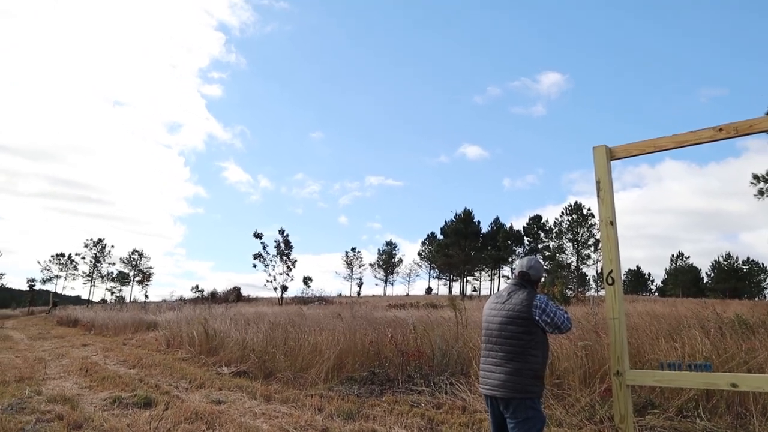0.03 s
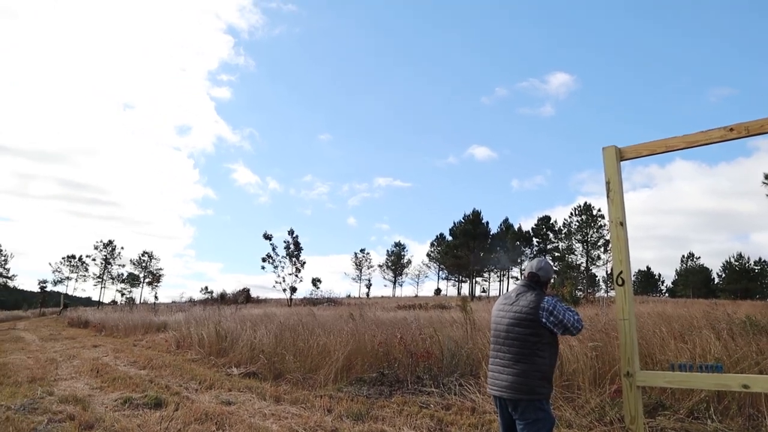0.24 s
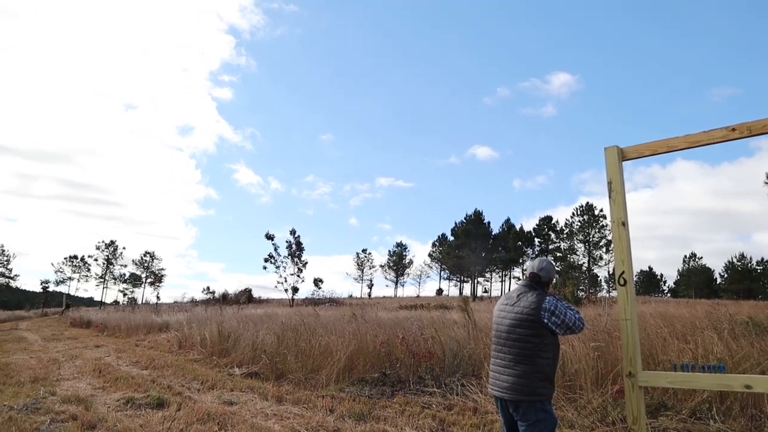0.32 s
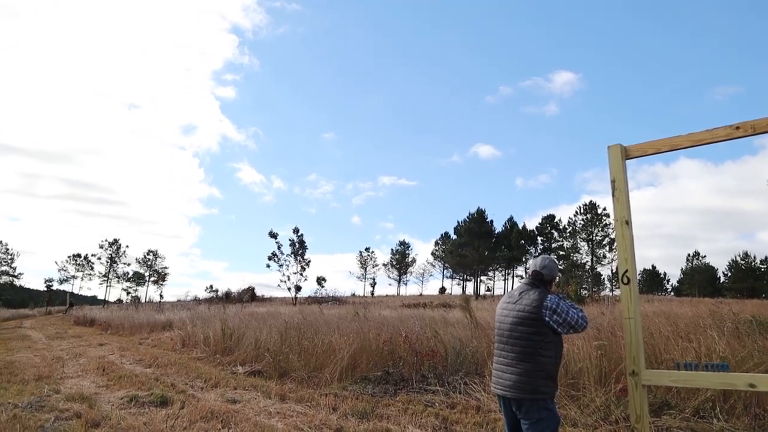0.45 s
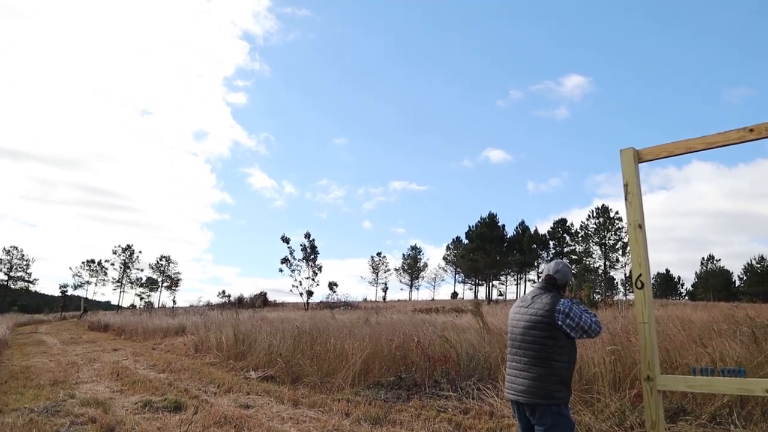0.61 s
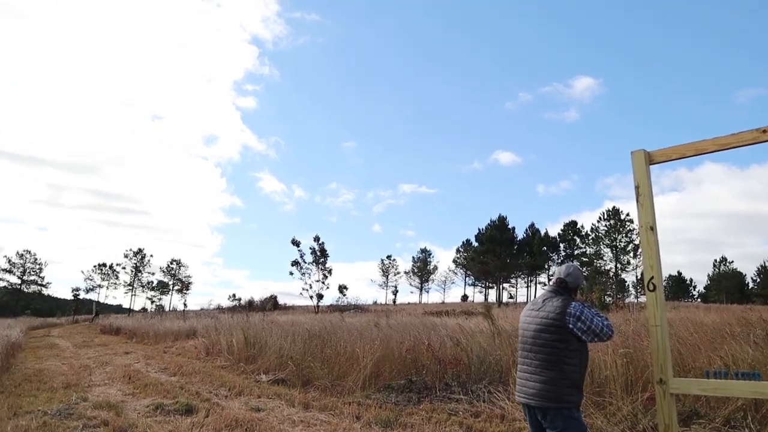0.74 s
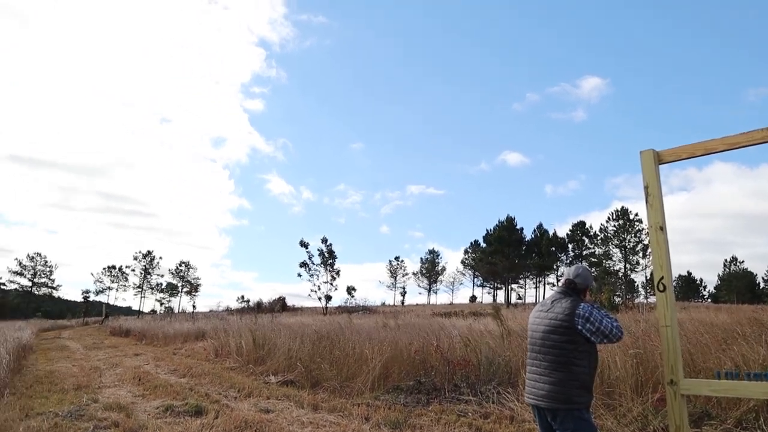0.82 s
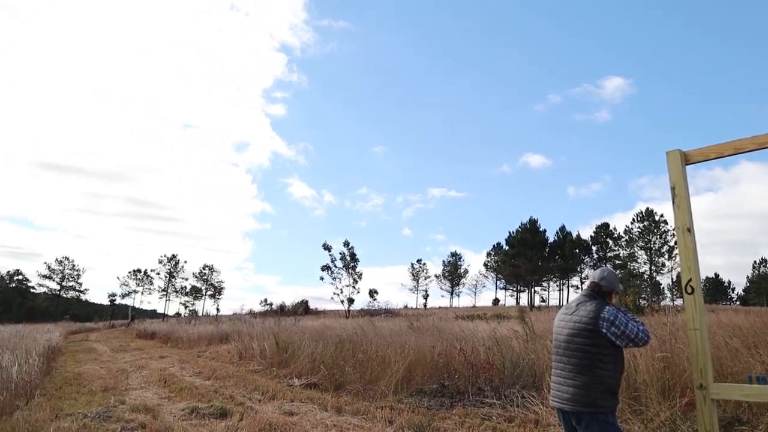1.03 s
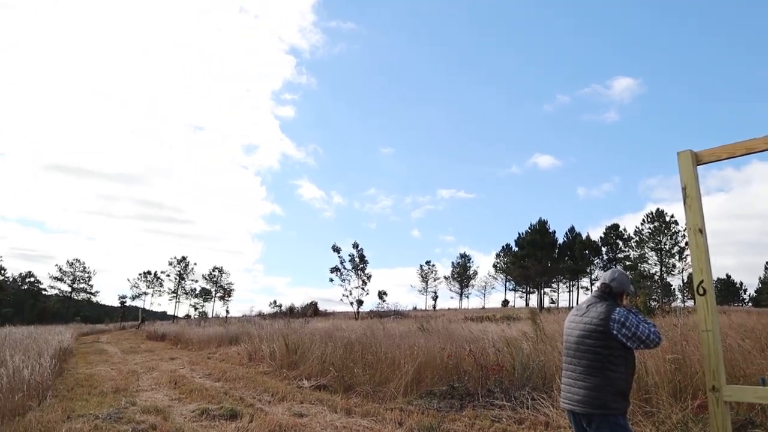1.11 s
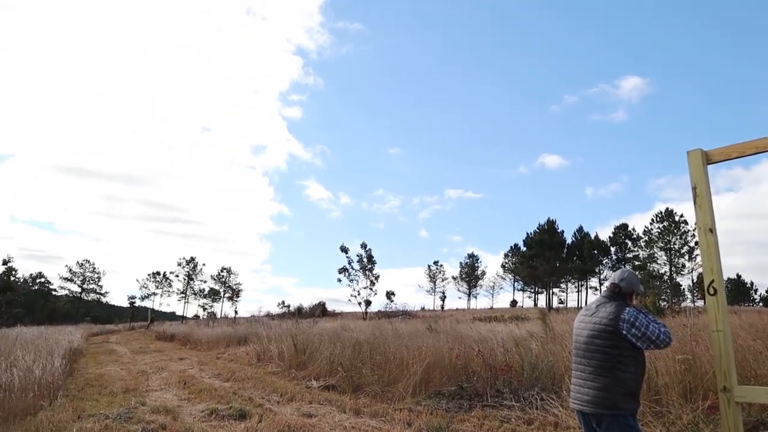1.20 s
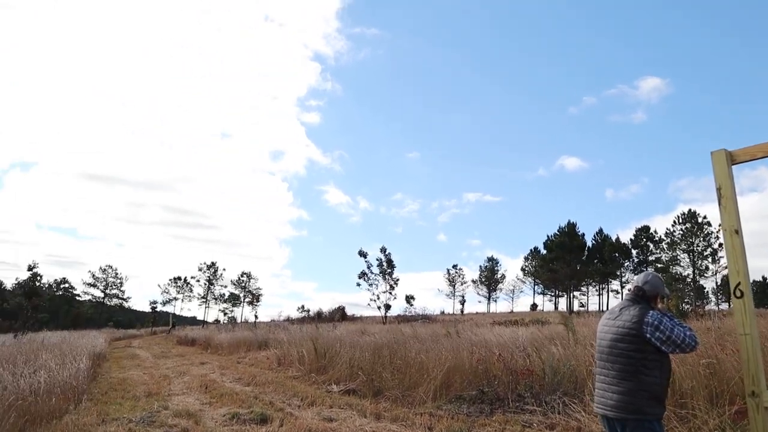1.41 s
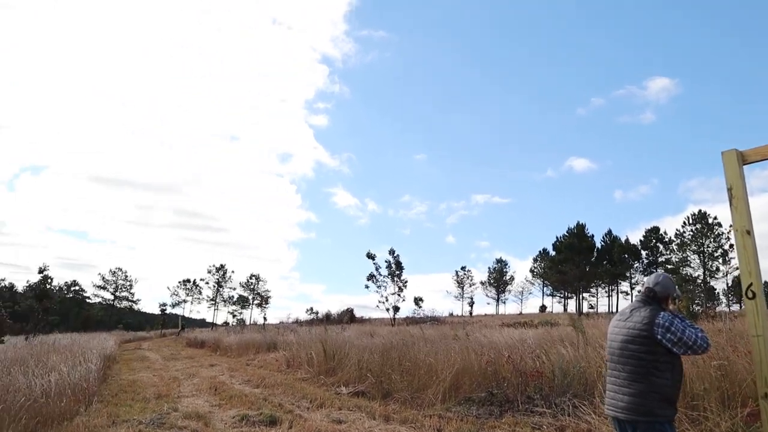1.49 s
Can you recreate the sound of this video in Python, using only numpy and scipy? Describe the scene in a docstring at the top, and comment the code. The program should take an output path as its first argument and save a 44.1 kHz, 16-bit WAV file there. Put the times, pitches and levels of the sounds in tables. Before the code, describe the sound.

Two quick shotgun shots, one dull and distant, one sharp and close, echoing across a field.

```python
"""A faint hush and light wind in an open grass field, then two shotgun shots a fifth of a second apart: a dull
one from further off, and a sharp one close by that overloads the microphone. Each shot is a pressure pulse with
a burst of gas noise. Grass and ground scatter it back as a rushing tail with a low roll, and a fence and clumps
of trees return separate echoes, duller the later they come."""
import sys
import numpy as np
from scipy import signal
from scipy.fft import rfft, irfft, next_fast_len
from scipy.io import wavfile
from scipy.ndimage import uniform_filter1d

SR = 44100
rng = np.random.default_rng(int(sys.argv[2]) if len(sys.argv) > 2 else 0)


def waveform_to_disk(signal):
    """Save audio, clipped to [-1, 1], as 16-bit WAV at the path in sys.argv[1]."""
    frames = np.transpose(np.atleast_2d(signal))
    scaled = np.clip(frames, -1, 1) * 32767
    samples = np.round(scaled).astype(np.int16)
    wavfile.write(sys.argv[1], SR, samples)


N = 68355
T = np.arange(N) / SR
FFT_SIZE, WINDOW = next_fast_len(N), 8192  # in samples; a window holds one pulse or echo
HZ = np.maximum(np.arange(FFT_SIZE // 2 + 1) * SR / FFT_SIZE, 1)

def from_db(db):
    """Turn decibels into a gain."""
    return 10 ** (db / 20)

def rms_one(x):
    """Scale to an average power of one."""
    return x / np.sqrt(np.mean(x ** 2) + 1e-20)

def colour_gain(colour, tilt_db=0, hz=HZ):
    """A colour says how strong each frequency is; the tilt brightens or dulls it."""
    points_hz, points_db = np.transpose(colour)
    db = np.interp(np.log(hz), np.log(points_hz), points_db)
    return rms_one(from_db(db + tilt_db * np.log2(np.maximum(hz, 300))))

def drift(per_s, size=N):
    """A random wander that turns so many times a second."""
    knots = rng.standard_normal(size // 8)
    return np.interp(T[:size] * per_s, np.arange(len(knots)), knots)

def noise(colour):
    """Steady noise of the given colour."""
    return rms_one(irfft(rfft(rng.standard_normal(FFT_SIZE)) * colour_gain(colour), FFT_SIZE)[:N])

def grains(size=N):
    """Countless tiny reflections of uneven strength."""
    white = rng.standard_normal(size)
    flicker_db = 3 * drift(2500, size) + 1.5 * drift(150, size)
    return rms_one(white * from_db(flicker_db))

def air_db(hz, delay_s, loss_db_per_khz_s=4.2):
    """The longer sound travels through air, the more treble it loses."""
    return -loss_db_per_khz_s * hz / 1000 * delay_s

def window_at(s):
    """The samples around one moment."""
    return slice(int(s * SR) - WINDOW // 2, int(s * SR) + WINDOW // 2)

def pulses(rows):
    """Blast waves: a steep front, a short first swing and a longer swing back."""
    out = np.zeros(N)
    for s, db, swing_ms, rise_ms, cut_hz in rows:
        part = window_at(s)
        ms = (T[part] - s) * 1000
        age = np.maximum(ms, 0) / swing_ms
        front = .5 * (1 + np.tanh(ms / rise_ms))
        wave = (age - 1) * np.exp(-age) * front
        low_cut = signal.butter(2, cut_hz, "high", fs=SR, output="sos")
        out[part] += from_db(db) * signal.sosfilt(low_cut, wave + 1e-18)
    return out

def burst(s, colour, db, rise_s, hold_s, fall_db_per_s):
    """A short puff of noise that rises, holds and dies away."""
    puff = noise(colour)
    puff /= np.sqrt(uniform_filter1d(puff ** 2, size=90) + 1e-9)  # even out its loudness
    rise = np.clip((T - s) / rise_s, 0, 1)
    return puff * rise * from_db(db - fall_db_per_s * np.clip(T - s - hold_s, 0, .1))

def tail(s, db, swell, crest_s, fall, linger_db, linger_fall):
    """Loudness that swells to a crest and falls, over a quieter lingering part; rates in dB a second."""
    late = T - s - crest_s
    before, after = np.minimum(late, 0), np.maximum(late, 0)
    main = from_db(db + swell * before - fall * after)
    lingering = from_db(linger_db - linger_fall * after)
    return np.hypot(main, lingering) * np.clip((T - s) / .003, 0, 1)

def scatter(s, colour, colour_at_s):
    """A rush off stalks and leaves that keeps dulling; it has the given colour after colour_at_s."""
    spectrum = rfft(grains(), FFT_SIZE) * colour_gain(colour)
    edges_hz = [0, 1000, 2000, 3200, 4600, 6500, 9000, 12000, 17000]
    late = np.maximum(T - s, 0) - colour_at_s
    out = np.zeros(N)
    for low, high in zip(edges_hz, edges_hz[1:]):
        band = irfft(spectrum * ((HZ >= low) & (HZ < high)), FFT_SIZE)[:N]
        out += band * from_db(air_db((low + high) / 2, late))
    return out

# Colours of the background. Each row: frequency in Hz, level in dB.
FADING_COLOUR = [(80, -8), (300, -10), (520, 0), (1100, -1), (2000, -6), (3000, -10), (4300, -16),
                 (5200, -28), (16000, -45)]
HUSH_COLOUR = [(25, 0), (60, -6), (150, -16), (350, -15), (600, -7), (1200, -10), (2500, -16), (5000, -29),
               (10000, -30), (16000, -36)]
WIND_COLOUR = [(15, -3), (35, 0), (70, -8), (150, -22), (1500, -90)]
def outdoors():
    """An earlier shot's echo fades into a steady hush; wind brushes the microphone."""
    fading = noise(FADING_COLOUR) * from_db(-53.5 - 32 * T)
    hush = noise(HUSH_COLOUR) * from_db(-61.5)
    wind = noise(WIND_COLOUR) * from_db(-63.5 + 2.5 * drift(per_s=8))
    return fading + hush + wind

# Colour of the answer from the woods. Each row: frequency in Hz, level in dB.
WOODS_COLOUR = [(100, -14), (350, -12), (580, 0), (1100, -1), (1600, -5), (2800, -8), (4200, -13),
                (5200, -18), (7500, -20), (10000, -26), (16000, -50)]
def far_woods(near_s):
    """Distant woods return the near shot as a soft, slow wash."""
    level = tail(near_s, db=-47, swell=24, crest_s=.58, fall=9, linger_db=-58, linger_fall=9)
    return scatter(near_s, WOODS_COLOUR, colour_at_s=.35) * level

# Knocks off far trunks. Each row: start in seconds, level in dB.
TRUNK_KNOCKS = [(1.156, -41), (1.2336, -34.5), (1.2592, -31.5), (1.311, -41), (1.355, -39.5), (1.412, -41),
                (1.465, -42)]
def lone_trunks(pitch_hz=750, ring_s=.0013, top_hz=3000):
    """Each lone trunk returns the blast as one small, rounded knock."""
    out = np.zeros(N)
    for s, db in TRUNK_KNOCKS:
        age = np.clip(T - s, 0, .1)
        out += from_db(db) * (T >= s) * np.cos(2 * np.pi * pitch_hz * age) * np.exp(-age / ring_s)
    return signal.sosfilt(signal.butter(2, top_hz, fs=SR, output="sos"), out + 1e-18)

# Colours of the ground's low rolls and rumble. Each row: frequency in Hz, level in dB.
FAR_ROLL_COLOUR = [(30, -24), (70, -19), (120, -11), (190, -1), (300, -1), (450, -9), (700, -26),
                   (3000, -80)]
NEAR_ROLL_COLOUR = [(30, -26), (70, -19), (120, -11), (190, -3), (280, 0), (440, -3), (700, -22),
                    (3000, -80)]
RUMBLE_COLOUR = [(25, -12), (70, -9), (120, -3), (175, 1), (270, -5), (420, -15), (1500, -80)]
# Dull thuds. Each row: start in seconds, level in dB, first swing in ms, rise in ms, bass cut in Hz.
THUDS = [(.263, -27, 1.2, .4, 150), (.2745, -24, 1.5, .4, 150), (.279, -27, 1.5, .4, 150),
         (.574, -14, 1.0, .3, 150)]
def ground(far_s, near_s):
    """The ground returns each shot as a low roll; its rises add thuds and a deep rumble."""
    far = tail(far_s, db=-39, swell=90, crest_s=.06, fall=220, linger_db=-49, linger_fall=40)
    near = tail(near_s, db=-30, swell=175, crest_s=.108, fall=140, linger_db=-55, linger_fall=34)
    deep = tail(near_s, db=-44.5, swell=35, crest_s=.28, fall=34, linger_db=-74, linger_fall=10)
    rolls = noise(FAR_ROLL_COLOUR) * far + noise(NEAR_ROLL_COLOUR) * near
    return rolls + noise(RUMBLE_COLOUR) * deep + pulses(THUDS)

# Colour of a tree echo. Each row: frequency in Hz, level in dB.
ECHO_COLOUR = [(60, -45), (250, -14), (450, -10), (950, -2), (1300, -3), (2400, -6.5), (4200, -9.5),
               (4800, -16), (6200, -17), (10400, -28.5), (16000, -58)]
# Each shot's echoes; the far shot's earliest, sharp ones come off a fence, the rest off clumps of trees. # Each
# row: middle in seconds, level in dB, spread in seconds, # brightness in dB per octave, favoured band in Hz.
FAR_ECHOES = [(.2247, -21, .0005, -1, 2500), (.2295, -32.5, .003, -1, 2800), (.299, -39.5, .005, 0, 1150),
              (.313, -38, .008, -.5, 700), (.345, -40, .006, 0, 900), (.358, -39, .006, -1.5, 800)]
NEAR_ECHOES = [(.413, -29, .003, -1, 1300), (.465, -33, .004, 0, 600), (.491, -28, .004, 0, 750),
               (.505, -28, .003, 0, 900), (.520, -28, .004, -1, 1800), (.549, -28, .005, -.3, 1500),
               (.591, -33.3, .007, 1, 1500), (.660, -29.3, .0045, .7, 1650), (.698, -28.8, .004, -.8, 650),
               (.746, -29.3, .0043, -.2, 1050), (.785, -37.5, .007, -1.3, 950),
               (.805, -37, .011, -.2, 1100), (.905, -39.8, .012, -.2, 880), (.971, -38, .005, 1, 3500),
               (1.006, -45, .01, .5, 2200), (1.039, -43.5, .007, 0, 750), (1.085, -50, .01, 1, 2500),
               (1.173, -48, .014, 0, 750), (1.228, -48.5, .012, -2.5, 650)]
def echo_swarms(far_s, near_s, boost_db=6, band_octaves=.3, colour_at_s=.3):
    """Each reflector, a fence or a clump of trees, returns a short swarm of reflections; its spacing favours
    one band."""
    out = np.zeros(N)
    hz = np.maximum(np.arange(WINDOW // 2 + 1) * SR / WINDOW, 1)
    for shot_s, echoes in (far_s, FAR_ECHOES), (near_s, NEAR_ECHOES):
        for s, db, spread_s, tilt_db, band_hz in echoes:
            part = window_at(s)
            swarm = grains(WINDOW) / np.cosh(np.clip((T[part] - s) / spread_s, -20, 20))
            band_db = boost_db * np.exp(-(np.log2(hz / band_hz) / band_octaves) ** 2)
            dulling_db = air_db(hz, s - shot_s - colour_at_s)
            gain = rms_one(colour_gain(ECHO_COLOUR, tilt_db, hz) * from_db(band_db + dulling_db))
            out[part] += from_db(db) * irfft(rfft(swarm) * gain)
    return out

# Colours of the rush off the grass. Each row: frequency in Hz, level in dB.
FAR_GRASS_COLOUR = [(150, -10), (500, -5), (1000, -3), (3000, 0), (4300, -2), (5200, -11), (8000, -13.5),
                    (12000, -23), (16000, -48)]
NEAR_GRASS_COLOUR = [(120, -28), (250, -8), (400, -2), (700, -9.5), (1300, -9), (2900, -10), (5100, -16),
                     (9900, -18.5), (14000, -25), (16000, -40)]
def grass(far_s, near_s):
    """Countless stalks scatter each shot into a rushing tail."""
    far = scatter(far_s, FAR_GRASS_COLOUR, colour_at_s=.03)
    far *= tail(far_s, db=-31.5, swell=100, crest_s=.008, fall=440, linger_db=-41.5, linger_fall=30)
    near = scatter(near_s, NEAR_GRASS_COLOUR, colour_at_s=.09)
    near *= tail(near_s, db=-26.6, swell=75, crest_s=.092, fall=185, linger_db=-44, linger_fall=43)
    return far + near

# The far blast, direct and then off the ground.
# Each row: start in seconds, level in dB, first swing in ms, rise in ms, bass cut in Hz.
FAR_PULSES = [(.21164, 4.2, 1.12, .17, 130), (.2154, -13, .25, .22, 60)]
# Colour of its gas. Each row: frequency in Hz, level in dB.
FAR_GAS_COLOUR = [(200, -16), (780, -14), (1130, 9), (1650, -7), (2400, 0), (3300, -6), (4300, -8),
                  (5500, -19), (7200, -14), (12000, -27), (16000, -50)]
def far_shot(s):
    """The duller bang: a rounded pressure pulse and a puff of gas."""
    gas = burst(s, FAR_GAS_COLOUR, db=-13.5, rise_s=.0002, hold_s=.002, fall_db_per_s=3300)
    return pulses(FAR_PULSES) + gas

# The near blast, direct and off the ground, and the low thump of the overloaded microphone swinging back.
# Each row: start in seconds, level in dB, first swing in ms, rise in ms, bass cut in Hz.
NEAR_PULSES = [(.40568, 4.5, .16, .02, 20), (.40958, 9.2, .33, .02, 15)]
NEAR_THUMP = [(.4068, -4, 2.2, .6, 15)]
# Colour of its gas. Each row: frequency in Hz, level in dB.
NEAR_GAS_COLOUR = [(150, -16), (650, -16), (1200, -1), (1750, 0), (2400, 0), (3450, 6), (4300, -11),
                   (6500, -10), (13000, -17), (16000, -36)]
def near_shot(s, clack_s=.4006):
    """The gun's mechanism clacks, then come a steep pulse, a puff of gas and the microphone's thump."""
    # the clack shares the grass's broad colour
    clack = burst(clack_s, NEAR_GRASS_COLOUR, db=-25, rise_s=.0015, hold_s=.004, fall_db_per_s=1000)
    gas = burst(s, NEAR_GAS_COLOUR, db=-1, rise_s=.001, hold_s=.0018, fall_db_per_s=7000)
    return clack + pulses(NEAR_PULSES) - pulses(NEAR_THUMP) + gas

def scene(far_s=.2117, near_s=.4057):
    """Both shots and their echoes over the quiet field, in one channel."""
    background = outdoors()
    echoes = far_woods(near_s) + lone_trunks() + ground(far_s, near_s)
    echoes += echo_swarms(far_s, near_s) + grass(far_s, near_s)
    return (background + echoes + far_shot(far_s) + near_shot(near_s))[None]

def record(dry, top_hz=16700):
    """The microphone squashes the bangs, a little sooner on downward swings; the top treble is cut."""
    limit = np.where(dry > 0, .8, .78)
    squashed = dry / (1 + (dry / limit) ** 4) ** .25
    return signal.sosfiltfilt(signal.cheby2(12, 40, top_hz, fs=SR, output="sos"), squashed)

dry = scene()
out = record(dry)
waveform_to_disk(out)
```